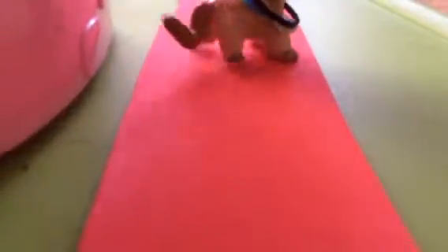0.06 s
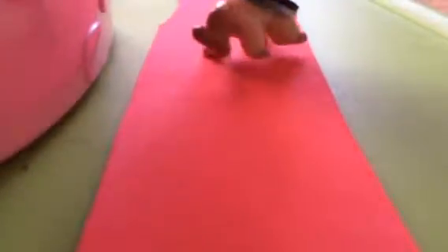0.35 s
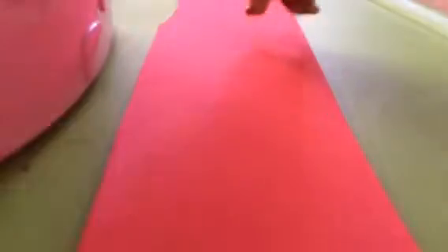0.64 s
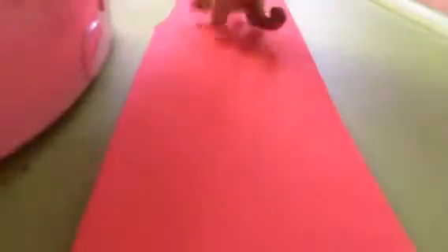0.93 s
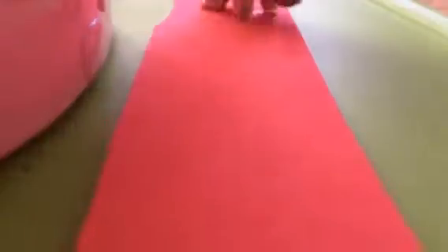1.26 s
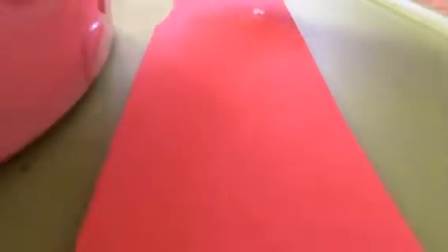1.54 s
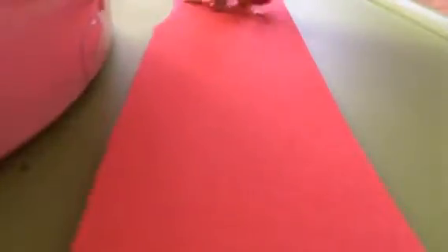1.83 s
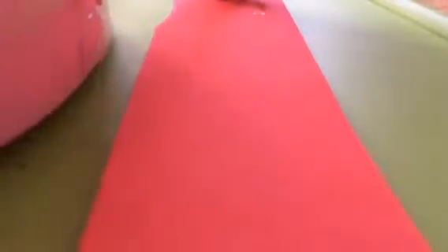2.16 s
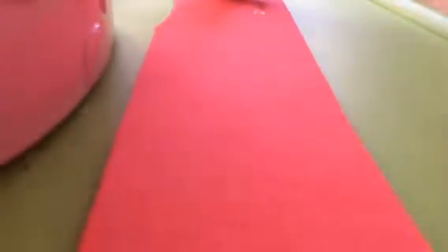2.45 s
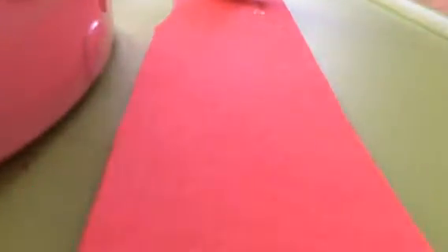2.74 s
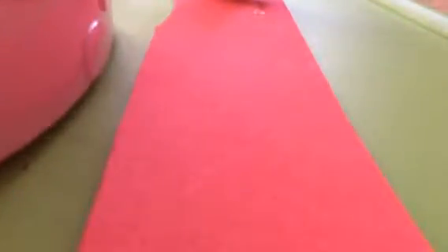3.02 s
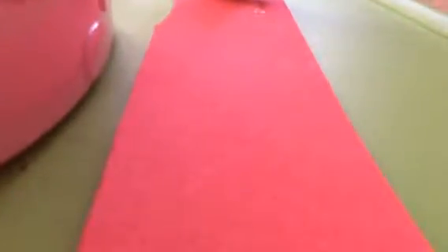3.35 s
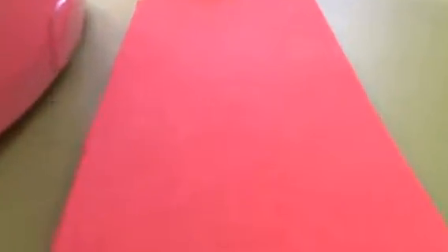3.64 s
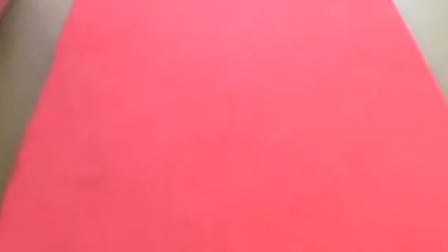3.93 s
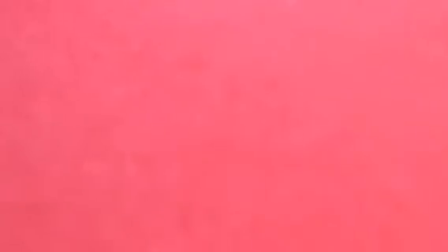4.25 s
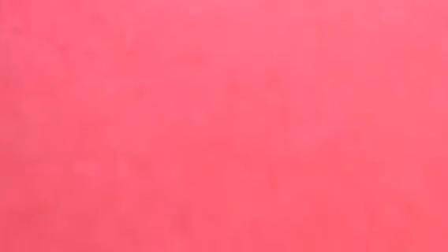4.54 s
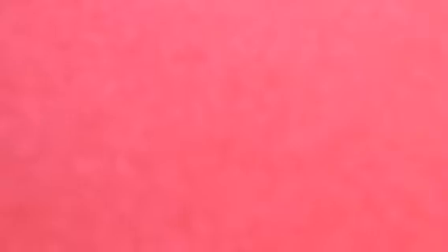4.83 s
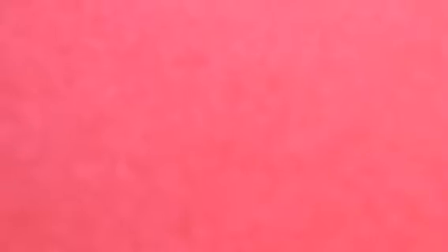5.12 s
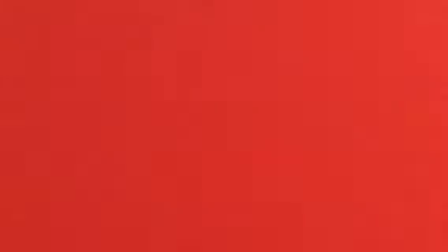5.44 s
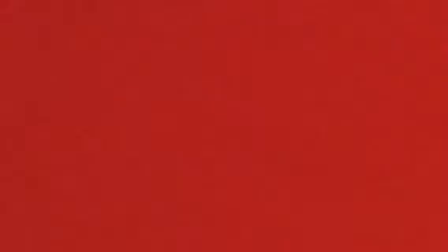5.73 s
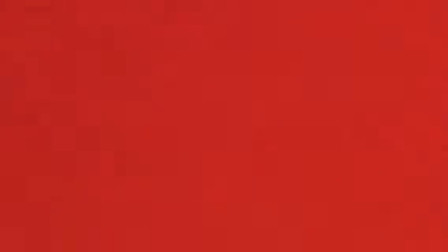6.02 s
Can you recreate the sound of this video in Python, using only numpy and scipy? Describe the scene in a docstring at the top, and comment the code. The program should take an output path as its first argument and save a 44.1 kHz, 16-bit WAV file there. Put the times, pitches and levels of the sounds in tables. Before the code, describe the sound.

Hollow knocks and lighter taps of a plastic toy figure walking over paper indoors, followed by brief handling noise.

```python
"""A small plastic toy figure is walked along a strip of paper on a hard floor, close to a camera.
First its feet shuffle. Four heavy hops knock on the floor and ring the hollow plastic, with lighter
steps between and after them, and the toy slides over the paper. After four seconds the camera case
ticks; then a finger bumps it, and skin rubs over it and snaps free. A low hum, hiss and a faint
electric buzz lie under it all."""
import sys
import numpy as np
from scipy import signal
from scipy.fft import rfft, irfft
from scipy.io import wavfile
from scipy.ndimage import uniform_filter1d, minimum_filter1d

SR = 44100
rng = np.random.default_rng(int(sys.argv[2]) if len(sys.argv) > 2 else 0)


def bounce(signal):
    """Save signal as a 16-bit WAV file at the path given by the first command-line argument."""
    frames = np.transpose(np.atleast_2d(signal))
    limited = np.clip(frames, -1, 1)
    pcm = np.round(limited * 32767).astype(np.int16)
    wavfile.write(sys.argv[1], SR, pcm)


N = 268260
TIME, FREQS = np.arange(N) / SR, np.fft.rfftfreq(N, 1 / SR)

# the tones that toy and floor ring with: (pitch [Hz], relative level [dB], time to fade by 60 dB [s])
FLOOR_TONES = [(63, -28, .1), (114, -21, .13), (182, -21, .07), (250.5, -12, .1), (290, -16, .07),
               (515, -17, .045), (574, -16, .065), (675, -19, .06), (958, -24, .05), (1180, -32, .04),
               (2020, -28, .06)]


def hops(other_foot_s=0.008, light_bass_db=-9):
    """The toy slaps the paper down, lands on one pair of feet, then drops onto the other pair."""
    # (landing time [s], first touch earlier by [s], peak [dB], hardness [Hz], extra bass [dB],
    #  second pair later by [s], its peak [dB], its hardness [Hz], change per bounce [dB],
    #  paper slap peak [dB], slap pitch [Hz], slap fade [s])
    landings = [(.825, 0.0011, 0.5, 315, 0.5, 0.025, -11.5, 287, -10, -26.5, 6020, 0.011),
                (1.268, 0.0088, 0.5, 325, 13, .018, -9, 556, -30, -23.5, 2714, 0.008),
                (1.708, 0.014, -2, 200, 3, .0115, 2, 940, -3, -26, 4960, 0.013),
                (2.127, .009, 0, 227, 0.5, .024, 3, 500, -6.5, -18.5, 2500, 0.0031)]
    out = np.zeros(N)
    for s, lead, db, hard_hz, bass_db, gap, second_db, second_hz, bounce_db, *slap in landings:
        slap_db, slap_hz, slap_fade = slap
        add(out, s - lead, scuff(slap_db, slap_hz, octaves=1.79, fade_s=slap_fade))
        add(out, *footfall(s - lead, db - 9, hard_hz=460, bass_db=-4))  # first touch
        add(out, *footfall(s, db, hard_hz, bass_db))
        for part in step(s + gap, second_db, second_hz, light_bass_db, bounce_db, bounces=1):
            add(out, *part)
        for pair_s, pair_db in (s, db), (s + gap, second_db):  # each pair's other foot follows softly
            add(out, *footfall(pair_s + other_foot_s, pair_db - 5.5, hard_hz=299, bass_db=light_bass_db))
    return out


def steps():
    """Single steps before, between and after the hops."""
    # (time [s], peak [dB], hardness [Hz], extra bass [dB], change per bounce [dB])
    single_steps = [(0.18, -20, 249, 4.5, -6), (.493, -32.5, 304, 2, -11), (.965, -25.5, 405, -4, 1),
                    (1.191, -15, 620, 2, -11), (1.371, -25, 653, -8, -11), (1.407, -22, 656, 0, -4),
                    (1.621, -24, 540, -1, -9), (1.815, -24.5, 815, -18, -2.5), (1.923, -23.5, 202, 6, -12),
                    (2.035, -22.5, 460, 11, -18), (2.335, -2.5, 1150, 5, -8.5),
                    (2.539, -10.5, 853, -3.5, -11.5), (2.691, -20.5, 392, -15, -29),
                    (2.755, -11, 813, -5, -13), (2.979, -15, 800, 2, -12.5), (3.212, -20, 840, -3, -7.5),
                    (3.4443, -18, 906, -7.5, -18)]
    out = np.zeros(N)
    for row in single_steps:
        for part in step(*row):
            add(out, *part)
    return out


def step(s, db, hard_hz, bass_db, bounce_db, bounces=2, bounce_s=0.0205, bounce_hz=343):
    """A foot cracks on the floor, knocks and bounces. Gives a list of (time, sound)."""
    crack_db = db - 22.5 + 7 * np.log2(hard_hz / 1000)  # softer feet crack less
    crack = scuff(crack_db, centre_hz=2310, octaves=1.0, fade_s=0.0017, skirt_db=-31)
    rebounds = [footfall(s + k * bounce_s, db + k * bounce_db, min(hard_hz, bounce_hz), bass_db)
                for k in range(1, bounces + 1)]
    return [(s, crack), footfall(s, db, hard_hz, bass_db)] + rebounds


def footfall(s, db, hard_hz, bass_db, chatter_s=0.0052, size=16384):
    """One blow as (time, sound): a soft foot stirs only the low tones, and weight adds bass."""
    hz, t = np.fft.rfftfreq(size, 1 / SR), (np.arange(size) - size // 2) / SR
    lead_samples = size // 8
    spot, grip = rng.standard_normal((2, len(FLOOR_TONES)))
    # the foot chatters on the paper as it settles, the more so the lighter it lands
    chatter = rng.standard_normal(size) * np.exp(-abs(t - chatter_s / 2) / chatter_s)
    contact = (t == 0) + gain_of(-15 - 0.96 * db) * chatter / np.linalg.norm(chatter)
    softness_db = -10.8 * np.log10(1 + (hz / hard_hz) ** 4)
    weight_db = bass_db / (1 + (hz / 190) ** 4)
    force = irfft(rfft(contact) * gain_of(softness_db + weight_db))[size // 2 - lead_samples:]
    # each spot favours other tones, and light landings ring more for their size
    floor = floor_response(tone_changes_db=3.5 * spot - 0.07 * db, detune=0.039 * grip)
    blow = signal.fftconvolve(force, floor)
    return s - lead_samples / SR, gain_of(db) * blow / abs(blow).max()


def floor_response(tone_changes_db, detune, ring_db=-17, delay_at_500_hz_s=0.001356, size=16384):
    """What one sharp tap sets off: a dull knock, its echoes, and the ring of toy and floor."""
    knock_colour = [(30, -14.5), (70, -12), (140, 9), (330, -5.5), (560, -1), (800, -20), (1300, -15.5),
                    (2500, -8.5), (5000, -48), (16000, -2)]  # a foot's dull knock: (frequency [Hz], level [dB])
    echoes = [(.0047, 0.029), (.0075, -0.52), (0.0138, -0.052), (0.0207, .2), (.0295, 0.0064)]  # from things close by: (delay [s], strength [factor])
    t, hz = np.arange(size) / SR, np.fft.rfftfreq(size, 1 / SR)
    knock = shortest_pulse(value_at(knock_colour, hz))
    knock /= abs(knock).max()
    out = knock.copy()
    for delay, gain in echoes:
        add(out, delay, gain * knock)
    for (pitch, db, ring_s), change_db, shift in zip(FLOOR_TONES, tone_changes_db, detune):
        fade = gain_of(ring_db + db + change_db - 60 * t / ring_s)
        out += fade * np.cos(2 * np.pi * pitch * (1 + shift) * t)
    # as the floor bends, high tones travel ahead of low ones
    return irfft(rfft(out) * np.exp(-4j * np.pi * delay_at_500_hz_s * np.sqrt(500 * hz)))


def clacks(rise_s=0.0009, spot_octaves=0.22, far_db=-22, size=8192):
    """A glancing blow rings the hollow plastic, most of all the tones that the struck spot favours."""
    blows = [(.822, -18.5, 1350), (.894, -31, 990), (1.267, -18, 1080), (1.462, -31.5, 1100),
             (1.7195, -3.5, 660), (2.148, -16, 1352), (3.4442, -25, 1580), (3.819, -31.5, 1660),
             (4.8615, -16, 1790)]  # glancing blows: (time [s], relative level [dB], favoured pitch [Hz])
    # the plastic's own tones: (pitch [Hz], relative level [dB], time to fade by 60 dB [s])
    plastic_tones = [(552, -0.5, 0.063), (669, 4, 0.057), (793, -17, .04), (970, -3, 0.075),
                     (1080, 5, 0.01), (1378, -13, 0.11), (1607, -0.5, 0.015), (2050, 3.5, 0.022)]
    out, t = np.zeros(N), np.arange(size) / SR
    for s, db, spot_hz in blows:
        for hz, tone_db, ring_s in plastic_tones:
            spot_db = far_db * (1 - np.exp(-(np.log2(hz / spot_hz) / spot_octaves) ** 2))
            loudness = gain_of(db + tone_db + spot_db - 60 * t / ring_s) * (1 - np.exp(-t / rise_s))
            add(out, s, loudness * np.sin(2 * np.pi * hz * t))
    return out


def shuffle(rise_s=0.0017, fall_db_per_s=393):
    """The feet shuffle on the paper: each stroke bites quickly, holds and dies away."""
    strokes = [(0, 0.006, -41), (0.048, 0.024, -45.5), (0.113, 0.034, -42.5), (0.173, 0.02, -43.5),
               (0.221, 0.019, -46.5), (0.272, 0.039, -49.5), (0.356, 0.12, -56), (0.464, 0.11, -54.5)]  # foot strokes: (start [s], length [s], relative level [dB])
    colour = [(30, -3), (120, 0.5), (300, -2.5), (600, -4.5), (900, -11), (1600, -17), (4000, -18.5),
              (6500, -22.5), (15000, -27.5)]  # feet on paper: (frequency [Hz], relative level [dB])
    strength = np.zeros(N)
    for s, length, db in strokes:
        bite = np.clip((TIME - s) / rise_s, 0, 1)
        strength += bite * gain_of(db - fall_db_per_s * np.maximum(TIME - s - length, 0))
    return rub(strength, colour, (1200, 8300), db=-2.5, grain_db=1, catches_per_s=8100, uneven_db=3.5)


def slide():
    """The toy brushes over the paper in one long stroke."""
    push = [(2.66, -55), (2.76, -46.5), (2.776, -34.5), (2.874, -38), (2.948, -44.5), (2.954, -40.5),
            (3.06, -63)]  # strength of the stroke: (time [s], relative level [dB])
    colour = [(180, -16), (300, 0.5), (440, -15.5), (537, -4.5), (946, -7), (2030, -21.5), (3240, -16.5),
              (4020, -18), (13500, -9), (15200, -11.5), (16000, -12)]  # plastic on paper: (frequency [Hz], relative level [dB])
    return rub(pressure(push), colour, (3500, 16600),
               db=-0.5, grain_db=0.5, catches_per_s=20000, uneven_db=1.5)


def scuffs(ticks_per_s=20):
    """Small slips of toy, paper and fingers, snaps of skin, and faint ticks of the held camera case."""
    slips = [(.002, -27, 503, 0.53, 0.019), (.058, -30.5, 557, 0.41, 0.032),
             (0.149, -22, 11500, 1.1, 0.0022), (0.43, -29, 9500, 0.19, 0.004),
             (0.49, -32.5, 10100, .4, 0.0046), (1.717, -19.5, 950, 0.69, 0.039),
             (1.821, -37, 11000, 0.77, 0.02), (1.8543, -15.5, 9900, 1.56, 0.0034),
             (2.335, -30, 4630, 0.71, .012), (2.869, -28.5, 990, 0.38, 0.027),
             (2.873, -30, 3860, 0.8, .022), (3.06, -39.5, 1100, 0.58, 0.066),
             (3.271, -38, 1690, 0.47, 0.0039), (3.4433, -16, 1490, 0.46, 0.0013),
             (4.331, -34, 1890, 5.4, 0.0013), (4.801, -39, 1430, 2, 0.0027),
             (4.856, -24.5, 2000, 2.6, 0.0057), (5.599, -41, 1740, 0.42, 0.0047),
             (5.796, -22, 1340, 2.2, 0.0018), (5.8644, -16.5, 7000, 4.4, 0.0044),
             (5.911, -20.5, 6970, 0.25, 0.026), (5.804, -30, 885, 0.44, 0.013),
             (5.905, -31, 1300, 0.53, 0.038), (6.03, -31.5, 840, 0.18, 0.00084)]  # short slips: (time [s], peak [dB], pitch [Hz], width [octaves], fade [s])
    snaps = [(5.886, -21), (5.898, -20), (5.9541, -16.5), (5.9588, -15), (5.964, -15.5), (5.997, -28)]  # skin snapping free of the case: (time [s], peak [dB])
    out = np.zeros(N)
    for s, db, centre_hz, octaves, fade_s in slips:
        add(out, s, scuff(db, centre_hz, octaves, fade_s))
    for s, db in snaps:
        add(out, s, scuff(db, centre_hz=8000, octaves=0.61, fade_s=0.0008))
    for s in np.arange(4.23, 4.47, 1 / ticks_per_s):
        late_s = rng.random() / ticks_per_s / 2
        add(out, s + late_s, scuff(db=-41, centre_hz=1600, octaves=0.9, fade_s=0.0024))
    return out


def scuff(db, centre_hz, octaves, fade_s, skirt_db=-34, size=8192):
    """A tiny slip: rubbing noise that swells and fades, skirt_db weaker far from its centre pitch."""
    t, hz = np.arange(size) / SR, np.fft.rfftfreq(size, 1 / SR)
    octaves_away = np.log2((hz + 1) / centre_hz)
    colour = shortest_pulse(skirt_db * (1 - np.exp(-(octaves_away / (2 * octaves)) ** 2)))
    swell = (t / fade_s * np.exp(-2 * t / fade_s)) ** 1.3
    burst = signal.fftconvolve(rng.standard_normal(size) * swell, colour)[:size]
    return gain_of(db) * burst / abs(burst).max()


def finger_bump(s=5.3378, gain_db=-12.5, throb_s=0.0048, push_s=0.00078, click_lead_s=0.0054):
    """A finger meets the camera: a click, a blunt push, a short throb of the case and a slip of skin."""
    case_tones = [(235, -29), (320, 2.5), (430, -7.5)]  # the case's throb: (pitch [Hz], relative level [dB])
    t = TIME - s
    tones = sum(gain_of(db) * np.sin(2 * np.pi * hz * t) for hz, db in case_tones)
    throb = np.exp(-abs(t) / throb_s) * tones
    push = 2 * t / push_s * np.exp(-(t / push_s) ** 2 / 2)
    out = -gain_of(gain_db) * (throb + push)
    add(out, s - click_lead_s, scuff(db=-15.5, centre_hz=8500, octaves=1.5, fade_s=0.0038))
    add(out, s - click_lead_s / 2, scuff(db=-19, centre_hz=1100, octaves=1.0, fade_s=0.0042))
    add(out, s + 0.0039, scuff(db=-31, centre_hz=585, octaves=2.3, fade_s=0.024))  # the skin slips
    return out


def finger_rub():
    """Fingers scrape over the camera case."""
    grip = [(5.53, -75), (5.56, -52.5), (5.775, -48), (5.815, -37), (5.85, -43), (5.925, -34), (5.976, -38),
            (6.06, -47)]  # strength of the rub: (time [s], relative level [dB])
    colour = [(88, -48), (150, -13), (240, 1.5), (303, -8.5), (383, -2), (675, -0.5), (837, 1),
              (1900, -14.5), (3550, -10), (4080, -10), (4950, -12.5), (7770, -7), (10000, -13), (14500, -9),
              (16000, -25)]  # skin on the case: (frequency [Hz], relative level [dB])
    return rub(pressure(grip), colour, (3200, 15300),
               db=-3, grain_db=2.5, catches_per_s=9900, uneven_db=3.5)


def rub(strength, colour, band_hz, db, grain_db, catches_per_s, uneven_db):
    """Fibres catch and let go at random under a stroke of uneven pressure."""
    catches = (rng.random(N) < catches_per_s / SR) * rng.standard_normal(N)
    catches *= gain_of(grain_db * np.minimum(rng.exponential(1, N), 4))  # a few catch harder
    catches *= gain_of(uneven_db * wander(rate_hz=41))
    return coloured(catches, colour, band_hz) * gain_of(db) * strength


def room(x, build_s=0.0087, size=22050):
    """The small room answers with a short wash of echoes, its deepest bass lasting longest."""
    ring_times = [(80, 0.6), (260, 0.1), (700, 0.22), (2000, 0.2), (6000, 0.15)]  # how long the room rings: (frequency [Hz], time to fade by 60 dB [s])
    hz, t, noise = signal.stft(rng.standard_normal(size), SR, nperseg=256)
    fade = gain_of(-60 * t / value_at(ring_times, hz)[:, None])
    build_up = 1 - np.exp(-(t / build_s) ** 2)
    tail = signal.istft(noise * fade * build_up, SR)[1]
    return signal.fftconvolve(x, tail / np.linalg.norm(tail))[:N]


def background(ticks_per_s=120, buzz_db=-6, hiss_db=-60):
    """Hiss, a buzz of uneven electric ticks at twice the mains rate, and a low machine hum."""
    hiss_colour = [(20, -12), (60, -8), (130, -9), (190, -4), (260, -11.5), (450, -18), (560, -15.5),
                   (750, -21), (1700, -25), (2600, -28), (5200, -23), (7100, -31), (9400, -25),
                   (15500, -32.5)]  # hiss and buzz: (frequency [Hz], relative level [dB])
    hum_tones = [(64.6, -58.5), (193.8, -57)]  # the machine's tones: (pitch [Hz], base level [dB])
    # the background sinks during the hops and dips briefly near the end: (time [s], level change [dB])
    swell = [(0, 5.5), (.8, 2), (.95, -3.5), (2.4, 3.5), (3.5, 2.5), (5.33, 4.5), (5.42, -4), (5.55, -3.5),
             (6.08, 3)]
    at = np.round(np.arange(0, N - 1, SR / ticks_per_s)).astype(int)
    tick_db = 4 * np.clip(rng.standard_normal(len(at)), -2, 2)
    ticks = np.zeros(N)
    ticks[at] = gain_of(tick_db) * rng.choice([-1, 1], len(at))
    buzz = gain_of(buzz_db) * evened(ticks)
    buzzy_hiss = coloured(rng.standard_normal(N) + buzz, hiss_colour, band_hz=(2000, 15000))
    hum = sum(np.sqrt(2) * gain_of(db + wander(rate_hz=0.22)) * np.sin(2 * np.pi * hz * TIME)
              for hz, db in hum_tones)
    swell_db = np.interp(TIME, *np.transpose(swell))
    return gain_of(hiss_db + swell_db / 2) * buzzy_hiss + gain_of(swell_db) * hum


def gain_of(db):
    """Turns decibels into a factor to multiply by."""
    return 10 ** (np.asarray(db) / 20)


def pressure(curve):
    """Joins (time [s], level [dB]) points into a changing factor, near zero outside them."""
    return gain_of(np.interp(TIME, *np.transpose(curve), left=-120, right=-120))


def evened(x):
    """Scales x to an average strength (rms) of 1."""
    return x / np.sqrt(np.mean(x ** 2) + 1e-20)


def wander(rate_hz):
    """A slow random drift with an average strength of 1."""
    return evened(irfft(rfft(rng.standard_normal(N)) * np.exp(-(FREQS / rate_hz) ** 2), N))


def value_at(points, hz):
    """Reads between (frequency, value) points, giving each octave equal room."""
    point_hz, value = np.transpose(points)
    return np.interp(np.log(hz + 1), np.log(point_hz + 1), value)


def coloured(x, colour, band_hz):
    """Gives x a colour (a balance of low and high), with an average strength of 1 inside the band."""
    spectrum = rfft(x) * gain_of(value_at(colour, FREQS))
    in_band = (FREQS > band_hz[0]) * (FREQS < band_hz[1])
    return irfft(spectrum, N) / np.std(irfft(spectrum * in_band, N))


def shortest_pulse(db):
    """The shortest click with these levels from low to high, and no sound before its start."""
    folded = irfft(np.log(gain_of(np.maximum(db, -100))))
    half = len(folded) // 2
    folded[1:half] *= 2
    folded[half + 1:] = 0
    return irfft(np.exp(rfft(folded)))


def add(mix, s, sound):
    """Lays a sound into the mix at s seconds."""
    part = mix[max(round(s * SR), 0):][:len(sound)]
    part += sound[:len(part)]


def scene():
    """Toy, paper and fingers in a small room, as one channel."""
    toy = hops() + steps() + clacks()
    slips = scuffs()
    rubbing = shuffle() + slide() + finger_rub()
    echo = gain_of(-15.5) * room(toy) + gain_of(-12.5) * room(slips)
    return (toy + slips + finger_bump() + rubbing + echo + background())[None]


def record(dry, low_cut_hz=50, high_cut_hz=15600, ceiling_db=-3, quick_db_per_s=600, slow_db_per_s=7):
    """Cuts the deepest bass, turns loud peaks down, then cuts the highest treble."""
    dry = signal.lfilter(*signal.butter(3, low_cut_hz, "highpass", fs=SR), dry)
    over_db = np.maximum(20 * np.log10(abs(dry[0]) + 1e-9) - ceiling_db, 0)
    # after a peak, a little of the volume comes back at once and the rest slowly
    quick, slow = TIME * quick_db_per_s, TIME * slow_db_per_s
    quick_cut_db = np.maximum.accumulate(over_db + quick) - quick
    slow_cut_db = np.maximum.accumulate(0.86 * over_db + slow) - slow
    cut_db = np.maximum(quick_cut_db, slow_cut_db)
    volume_db = uniform_filter1d(minimum_filter1d(-cut_db, size=89), size=89)
    treble_cut = signal.firwin(511, high_cut_hz, window=("kaiser", 9), fs=SR)
    return signal.oaconvolve(dry * gain_of(volume_db), treble_cut[None], "same")


dry = scene()
out = record(dry)
bounce(out)
```